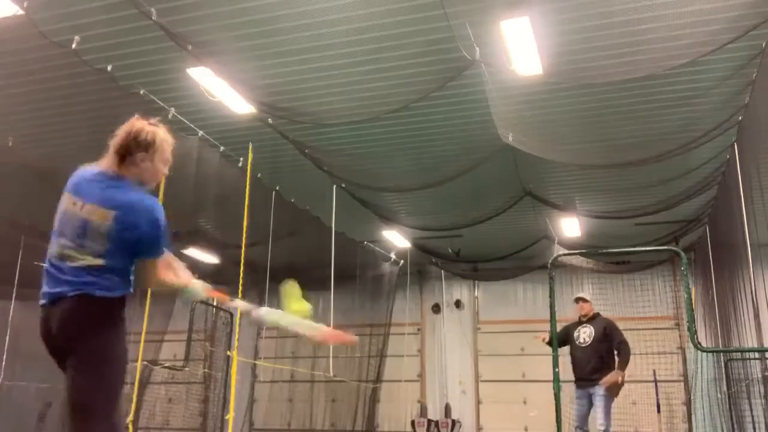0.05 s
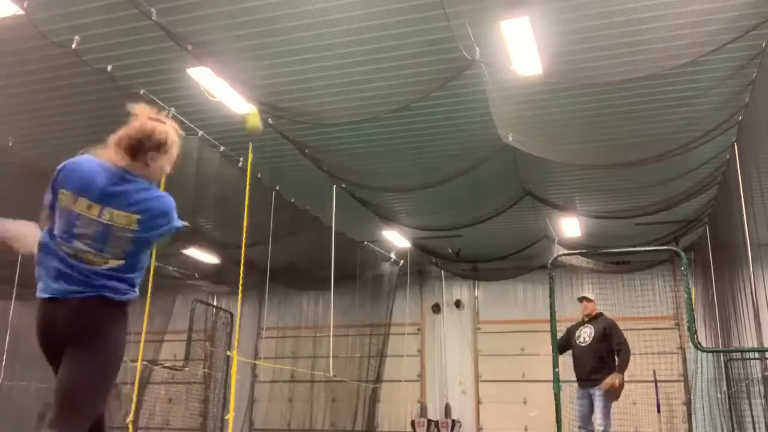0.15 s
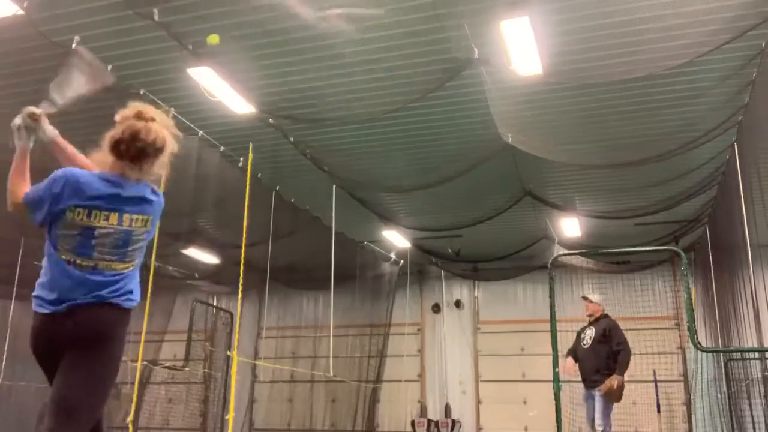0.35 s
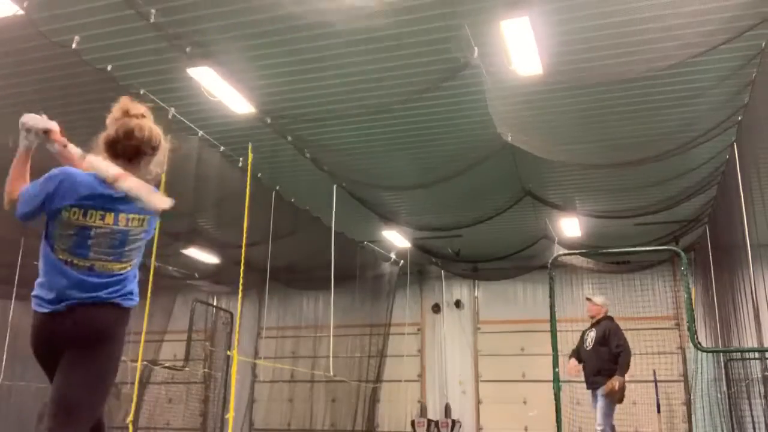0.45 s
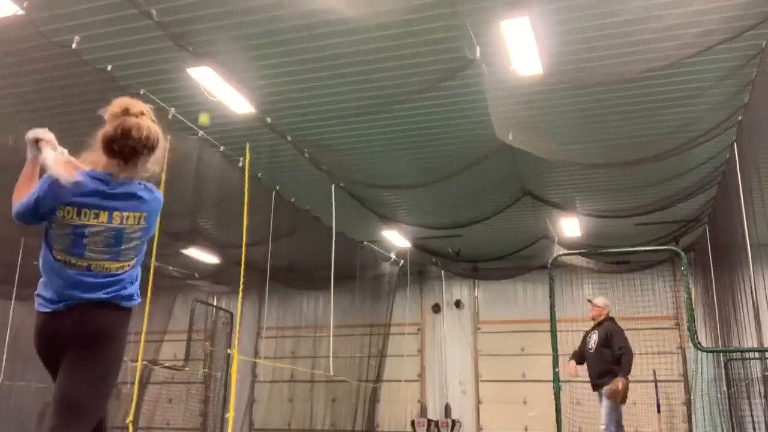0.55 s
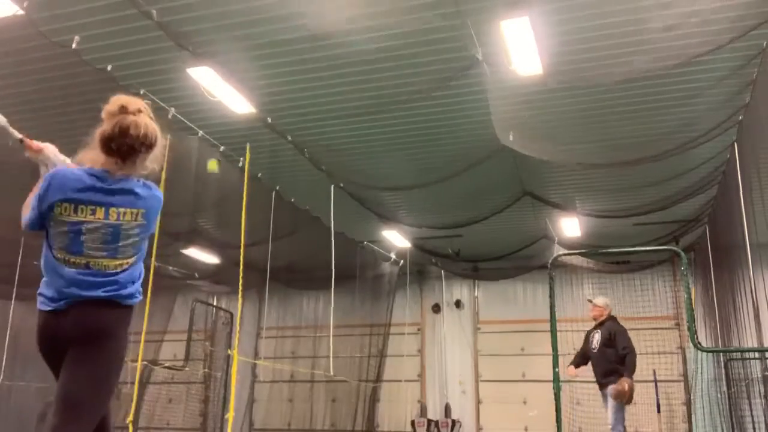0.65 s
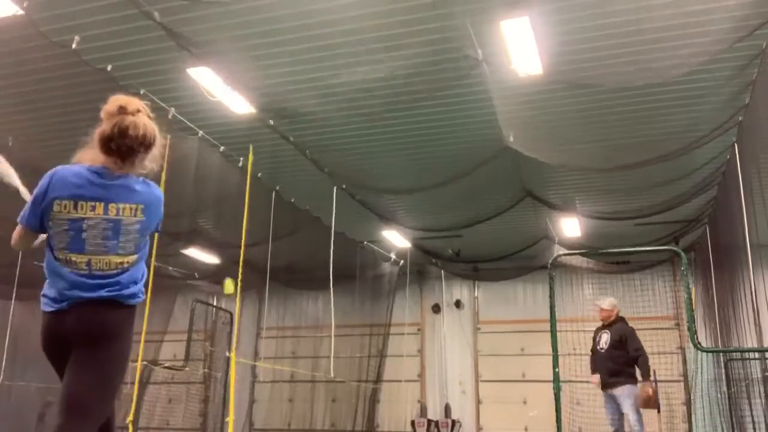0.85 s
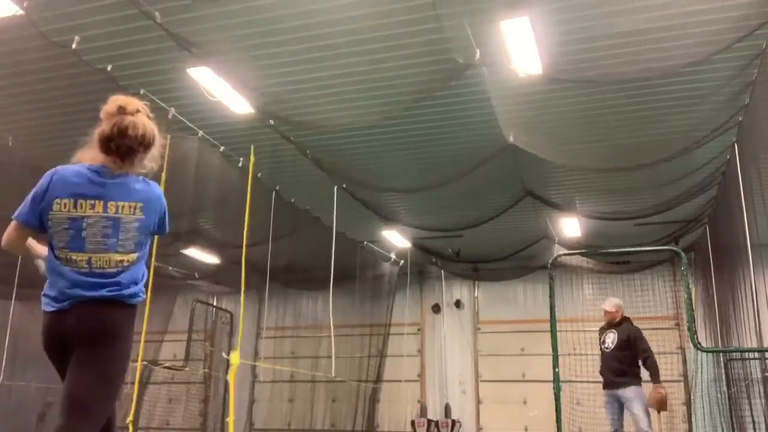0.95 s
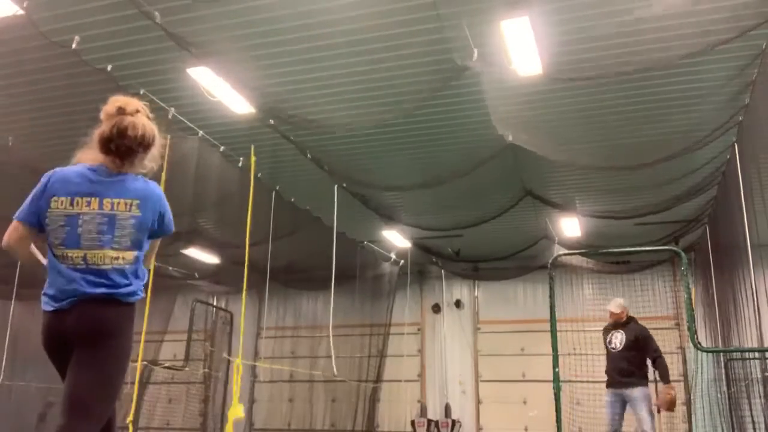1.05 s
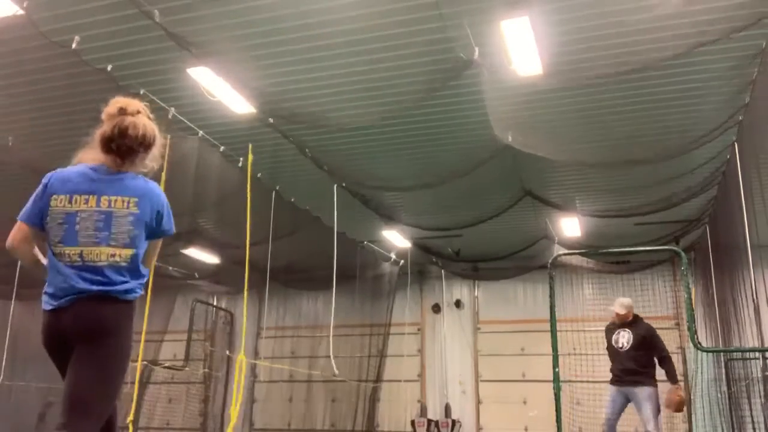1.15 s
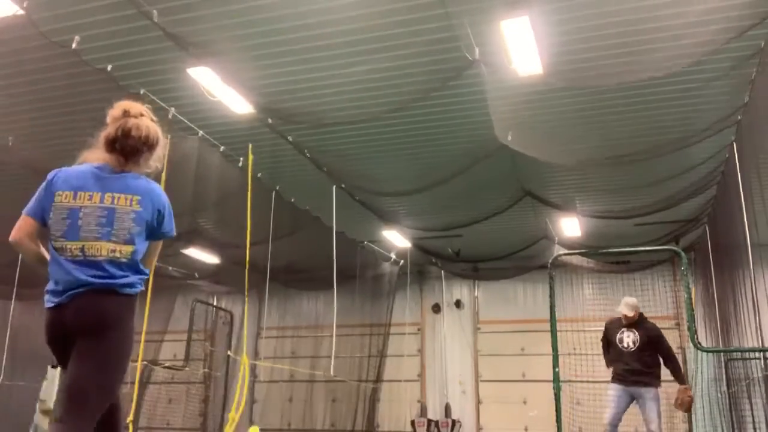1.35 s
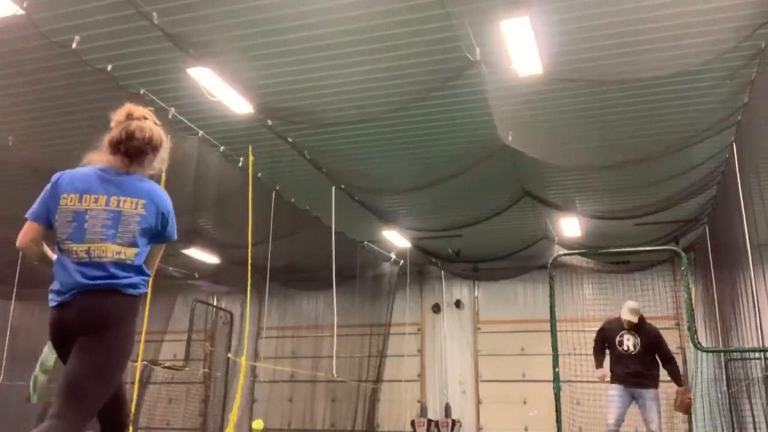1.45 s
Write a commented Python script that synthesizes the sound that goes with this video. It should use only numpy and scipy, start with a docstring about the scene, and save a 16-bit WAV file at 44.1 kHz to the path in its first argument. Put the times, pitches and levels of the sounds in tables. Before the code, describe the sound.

The loud crack of a bat on a softball rings out close by in an indoor batting cage. As the echo fades, the ball brushes the netting and drops with soft thuds, while ventilation rumbles quietly.

```python
"""A sharp crack and a short ring fill a large hall: a bat hits a softball in a netted cage.
The ball squashes against the hollow barrel of the bat and sets it ringing; the steel cage joins faintly.
Then the ball brushes the netting and drops with a few thuds, over the low rumble of ventilation.
A limiter turns the sound down at the crack and recovers slowly, which holds the echo's level
for half a second."""
import sys
import numpy as np
from scipy import signal
from scipy.fft import rfft, irfft
from scipy.io import wavfile
from scipy.ndimage import uniform_filter1d, minimum_filter1d

SR = 44100
rng = np.random.default_rng(int(sys.argv[2]) if len(sys.argv) > 2 else 0)


def generate_wav(signal):
    """Clip the signal to [-1, 1] and save it as 16-bit WAV at the path in sys.argv[1]."""
    frames = np.transpose(np.atleast_2d(signal))
    scaled = np.clip(frames, -1, 1) * 32767
    pcm = np.round(scaled).astype(np.int16)
    wavfile.write(sys.argv[1], SR, pcm)


N = 66150

HIT_S = .2085   # the bat meets the ball
HALL_DELAY_S, HALL_BUILD_S = 0.01, 0.002
LIMIT_DB, RELEASE_DB_PER_S, LOOKAHEAD_S = -3, 35.5, 0.0015

# Throughout, fade_s is the time a sound takes to fall by 60 dB.
# Tone of the spray of treble after the hit: pitch_hz, level_db
SIZZLE_TONE = [(500, -21.5), (2500, 8), (4200, -7.5), (5200, -6.5), (6300, -4.5), (8500, -6), (9800, -33.5)]
# Echoes from the floor and near walls: delay_s, level_db
NEAR_ECHOES = [(0.0169, -16), (0.0219, -14.5), (0.032, -21), (0.038, -32)]


def bat_hit():
    """The ball's hard cover ticks, the bat cracks and rings, and nearby surfaces echo it."""
    # Brief tones of ball on barrel: delay_s, pitch_hz, level_db, fade_s
    crack_tones = [(0.001637, 1112, 10.5, 0.027), (0.00057, 1870, 5, 0.026), (.0007, 2220, 1.5, 0.027),
                   (0.00018, 2700, 1.5, 0.024), (0.0006, 483, -3.5, 0.039), (.001, 94, -37, .035)]
    crack = sum(from_db(db) * ring(click(HIT_S + delay_s), hz, fade_s)
                for delay_s, hz, db, fade_s in crack_tones)
    body = crack + from_db(-19) * barrel(click(HIT_S))
    body = cut_treble(body, hz=3700)   # the ball squashes, softening the blow
    body = cut_bass(body, hz=51)   # small objects give off little bass
    tick = from_db(9.5) * ring(click(HIT_S), hz=7980, fade_s=0.0011)
    sizzle = noise(SIZZLE_TONE) * fade(HIT_S, fade_s=.024)
    direct = body + tick + sizzle
    echoes = sum(from_db(db) * delay(direct, delay_s) for delay_s, db in NEAR_ECHOES)
    return direct + cut_treble(echoes, hz=2500)


def barrel(force):
    """The bat's hollow barrel rings at its own pitches when pushed."""
    # The barrel's natural tones: pitch_hz, level_db, fade_s
    barrel_tones = [(1207.2, -4, 0.093), (1249.5, -3.5, 0.12), (1878, -15.5, 0.14), (2264, -19.5, 0.03),
                    (2690, -38, .08)]
    return sum(from_db(db) * ring(force, hz, fade_s) for hz, db, fade_s in barrel_tones)


def bat_in_hall():
    """The hit scatters brightly off the cage frame, then its crack and ring linger in the hall."""
    # Tone of the crack as the hall returns it: pitch_hz, level_db
    crack_echo_tone = [(60, -26), (150, -14.5), (220, -18), (300, -1), (500, 2), (750, -0.5), (1080, 4.5),
                       (1420, -9.5), (1570, -1.5), (1800, 5.5), (2100, -1.5), (2800, -2), (4200, -6.5),
                       (6500, -22), (9000, -24)]
    ringing = rms_one(barrel(rng.standard_normal(N)))
    wash = from_db(-16) * hall_resonances(noise(crack_echo_tone)) + from_db(-17) * ringing
    first_echo_s = HIT_S + NEAR_ECHOES[0][0]
    scatter = from_db(-17.5) * noise(SIZZLE_TONE) * fade(first_echo_s, fade_s=.16)
    # The ring's steady core comes back in a cluster of reflections and hangs in the hall.
    core_hz, cluster_delay_s, half_length_s = 1226.5, 0.053, 0.025
    core = np.sin(2 * np.pi * core_hz * since(HIT_S))
    cluster = np.maximum(1 - (since(HIT_S + cluster_delay_s) / half_length_s) ** 2, 0) ** 2
    core_level = from_db(-10) * cluster + from_db(-21) * fade(HIT_S, fade_s=1.63)
    return hall(wash, HIT_S) + scatter + core * core_level


def thuds():
    """The ball taps, drops and bounces, and feet settle: each a knock, a slap and a dull echo."""
    # Soft blows: start_s, level_db, brightness_hz, slap_db
    blows = [(1.1073, -38.5, 1410, -41), (1.3299, -22, 1310, -41), (1.3425, -26, 1770, -33),
             (1.3973, -20.5, 570, -43), (1.4342, -29.5, 500, -51)]
    # Tones the floor answers with: pitch_hz, level_db, fade_s
    floor_tones = [(97, -12.5, 0.2), (333, -16.5, 0.037), (584, -1, 0.0087), (926, -8, 0.016)]
    # Tone of the slap on contact: pitch_hz, level_db
    slap_tone = [(500, 10), (2000, -4), (4000, -1.5), (6300, 0.5), (7500, -17), (9000, -15)]
    # Tone of a thud as the hall returns it: pitch_hz, level_db
    thud_echo_tone = [(40, -18), (100, 12.5), (200, 13), (430, 9.5), (650, 1), (1100, -3), (1600, -31),
                      (6000, -40)]
    slap_lead_s = 0.0016
    sound = 0
    for start_s, db, brightness_hz, slap_db in blows:
        push = cut_bass(cut_treble(click(start_s), brightness_hz), hz=150)
        knock = sum(from_db(tone_db) * ring(push, hz, fade_s) for hz, tone_db, fade_s in floor_tones)
        slap = from_db(slap_db) * noise(slap_tone) * fade(start_s - slap_lead_s, fade_s=0.018)
        echo = from_db(-22.5) * hall(noise(thud_echo_tone), start_s)
        sound = sound + from_db(db) * (knock + echo) + slap
    return sound


def swishes():
    """Netting and clothes swish and billow, grainy as knots and folds slip one by one."""
    # Brushes of fabric: peak_s, level_db, rise_s, fade_s, pitch_hz, width_octaves
    brushes = [(.125, -55.5, 0.039, 1, 3500, 1), (.17, -57, 0.049, 0.067, 380, 0.97),
               (.383, -34, 0.0037, 0.073, 7000, 0.17), (0.587, -34.5, 0.0053, 0.28, 6600, 1),
               (.68, -46.5, 0.063, 2.1, 85, 0.72), (.68, -49, 0.11, 0.64, 5140, 0.2),
               (1.118, -52.5, 0.017, 0.89, 2780, 0.75), (1.347, -48, 0.013, 0.87, 3300, 0.55)]
    grain_db = 2
    flicker = rms_one(cut_treble(rng.standard_normal(N), hz=248))
    grain = rms_one(from_db(grain_db * flicker))
    sound = 0
    for peak_s, db, rise_s, fade_s, hz, width_octaves in brushes:
        loudness = np.where(since(peak_s) < 0, swell(peak_s, rise_s), fade(peak_s, fade_s))
        sound = sound + from_db(db) * noise_band(hz, width_octaves) * loudness
    return grain * sound


def cage_frame():
    """The steel frame rings faintly once the crack reaches it."""
    # Thin tones of the steel: pitch_hz, level_db
    steel_tones = [(1877, -50), (2240, -39), (2610, -53.5), (3075, -50.5), (3380, -54), (3677, -53.5)]
    arrival = click(HIT_S + HALL_DELAY_S)
    return sum(from_db(db) * ring(arrival, hz, fade_s=1) for hz, db in steel_tones)


def brief_hiss():
    """A brief hiss swells into the crack."""
    return from_db(-25.5) * noise_band(hz=1690, width_octaves=0.77) * swell(HIT_S, width_s=0.0089)


def swing_puff():
    """A low puff of the swing."""
    return from_db(-41.5) * noise_band(hz=68.6, width_octaves=.8) * swell(peak_s=.195, width_s=0.019)


def hall(wash, start_s):
    """Countless reflections build up and die away, the middle pitches lasting longest."""
    # How long the hall echoes: pitch_hz, fade_s
    echo_times = [(100, 1.1), (500, 1.88), (1200, 1.698), (2200, 1.244), (4000, 1), (8000, 1.08)]
    hz, fades_s = np.transpose(echo_times)
    spectrum, arrival_s = rfft(wash), start_s + HALL_DELAY_S
    shares = (np.interp(octaves(), np.log2(hz), row) for row in np.eye(len(hz)))
    bands = (irfft(spectrum * share, N) for share in shares)
    build_up = 1 - np.exp(-np.maximum(since(arrival_s), 0) / HALL_BUILD_S)
    return build_up * sum(band * fade(arrival_s, fade_s) for band, fade_s in zip(bands, fades_s))


def hall_resonances(sound):
    """Hard walls make some pitches louder and others quieter, by chance."""
    depth_db, spacing_hz = 2.5, 22.12
    hz = np.arange(N // 2 + 1) * SR / N
    bumps = np.clip(rng.standard_normal(N // 8), -2, 2)
    gain_db = depth_db * np.interp(hz / spacing_hz, np.arange(len(bumps)), bumps)
    return rms_one(irfft(rfft(sound) * from_db(gain_db), N))


def background():
    """Ventilation rumbles throughout; a low drone fades out under the crack."""
    # Tone of the ventilation and the hall: pitch_hz, level_db
    ventilation_tone = [(20, -14.5), (45, 0.5), (75, 6.5), (130, -9), (220, -10), (450, -13.5), (1000, -16),
                        (2000, -20.5), (5000, -30), (9000, -39)]
    drone_end_s, drone_fall_s = .3, 0.13
    fade_out = np.clip(-since(drone_end_s) / drone_fall_s, 0, 1)
    drone = from_db(-56.5) * noise_band(hz=127, width_octaves=0.11) * fade_out
    return from_db(-52.5) * noise(ventilation_tone) + drone


def from_db(db):
    return 10 ** (np.asarray(db) / 20)


def rms_one(sound):
    """Scale to an average strength (rms) of 1."""
    return sound / np.sqrt(np.mean(sound ** 2) + 1e-20)


def since(start_s):
    """Seconds since start_s, negative before it."""
    return np.arange(N) / SR - start_s


def delay(sound, delay_s):
    return np.interp(np.arange(N) - delay_s * SR, np.arange(N), sound, left=0)


def click(start_s):
    return np.maximum(1 - np.abs(since(start_s)) * SR, 0)


def fade(start_s, fade_s):
    """A level that jumps to 1, then falls 60 dB every fade_s."""
    return (since(start_s) >= 0) * from_db(-60 * np.maximum(since(start_s), 0) / fade_s)


def swell(peak_s, width_s):
    """A level that rises and falls in a bell shape."""
    return np.exp(-.5 * (since(peak_s) / width_s) ** 2)


def cut_treble(sound, hz):
    return signal.sosfilt(signal.butter(2, hz, fs=SR, output="sos"), sound + 1e-18)


def cut_bass(sound, hz):
    return signal.sosfilt(signal.butter(2, hz, "high", fs=SR, output="sos"), sound + 1e-18)


def ring(force, hz, fade_s):
    """Each click in force starts a pure tone that dies away."""
    decay = np.exp(-np.log(1000) / (fade_s * SR))
    angle = 2 * np.pi * hz / SR
    return signal.lfilter([0, np.sin(angle)], [1, -2 * decay * np.cos(angle), decay ** 2], force + 1e-18)


def octaves():
    """Each pitch in the spectrum, in octaves above 1 Hz."""
    return np.log2(np.maximum(np.arange(N // 2 + 1) * SR / N, 1))


def noise(tone):
    """Noise shaped by rows of pitch_hz, level_db."""
    hz, db = np.transpose(tone)
    gain = from_db(np.interp(octaves(), np.log2(hz), db))
    return rms_one(irfft(rfft(rng.standard_normal(N)) * gain, N))


def noise_band(hz, width_octaves):
    """Noise gathered around one pitch."""
    bell = np.exp(-.5 * ((octaves() - np.log2(hz)) / width_octaves) ** 2)
    return rms_one(irfft(rfft(rng.standard_normal(N)) * bell, N))


def scene():
    """All the sources together, in one channel."""
    hit = bat_hit() + bat_in_hall() + cage_frame()
    return (hit + swishes() + thuds() + swing_puff() + brief_hiss() + background())[None]


def record(dry):
    """A limiter dips just ahead of a loud peak and recovers slowly; then the top treble is cut."""
    over_db = np.maximum(20 * np.log10(np.abs(dry[0]) + 1e-9) - LIMIT_DB, 0)
    recovery_db = RELEASE_DB_PER_S * since(0)
    dip_db = np.maximum.accumulate(over_db + recovery_db) - recovery_db
    ahead_samples = int(LOOKAHEAD_S * SR) + 1
    gain_db = uniform_filter1d(minimum_filter1d(-dip_db, 2 * ahead_samples), ahead_samples)
    treble_cut = signal.cheby2(16, 60, 9850, fs=SR, output="sos")   # 60 dB down from 9850 Hz up
    return signal.sosfilt(treble_cut, dry * from_db(gain_db))


dry = scene()
out = record(dry)
generate_wav(out)
```